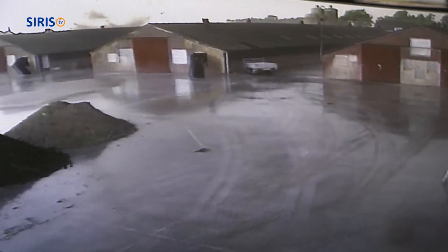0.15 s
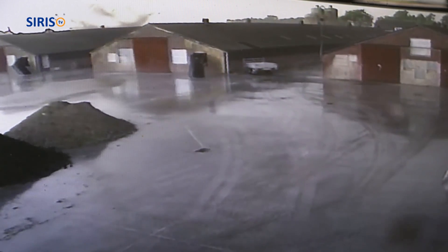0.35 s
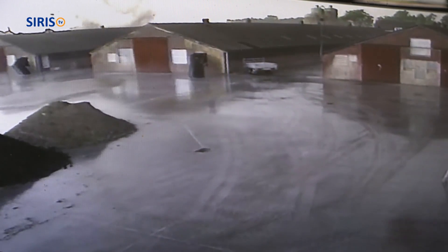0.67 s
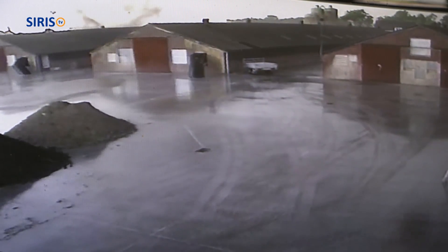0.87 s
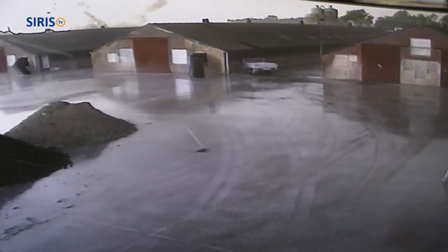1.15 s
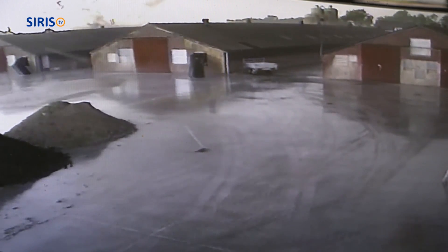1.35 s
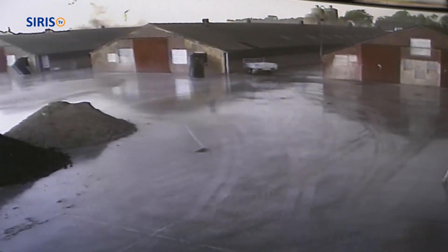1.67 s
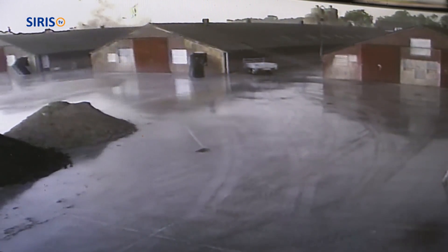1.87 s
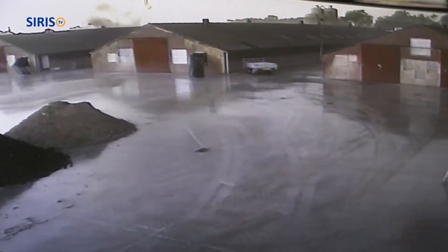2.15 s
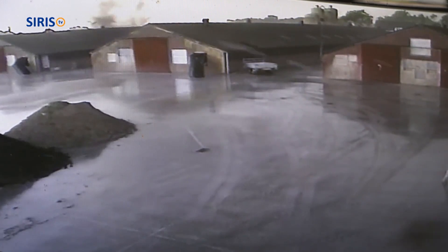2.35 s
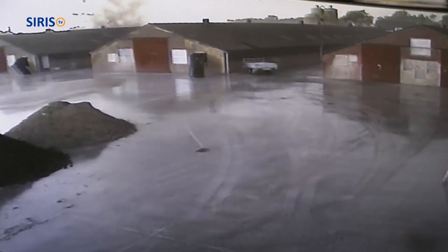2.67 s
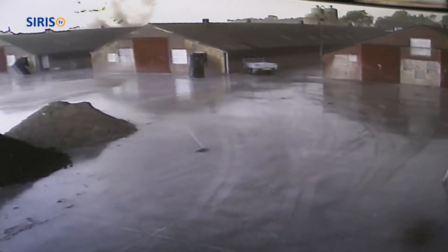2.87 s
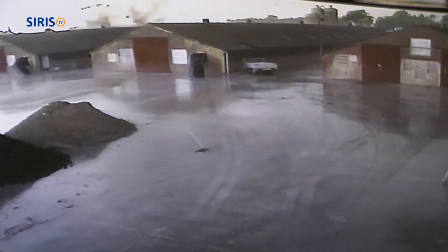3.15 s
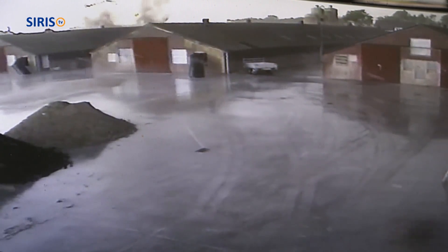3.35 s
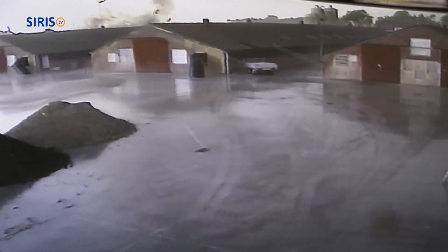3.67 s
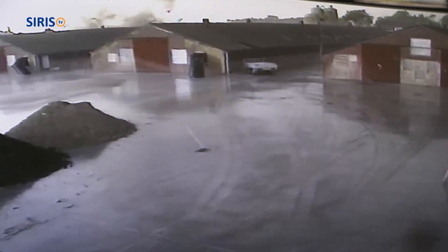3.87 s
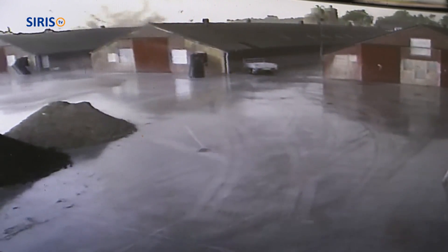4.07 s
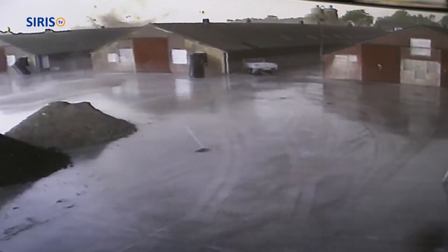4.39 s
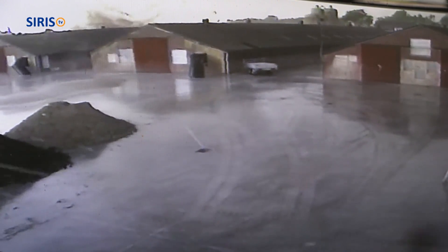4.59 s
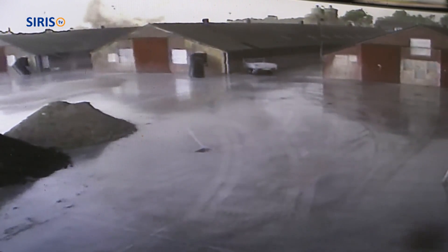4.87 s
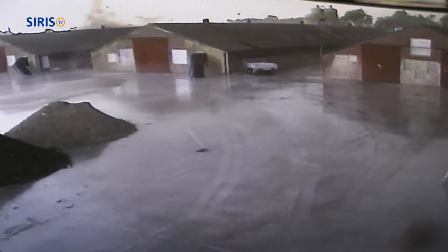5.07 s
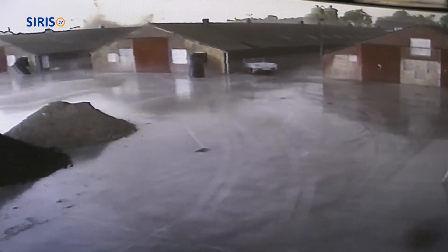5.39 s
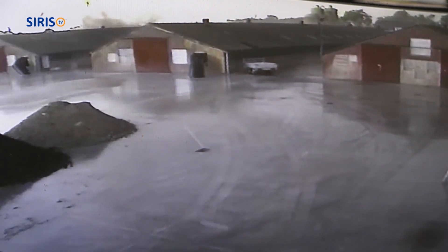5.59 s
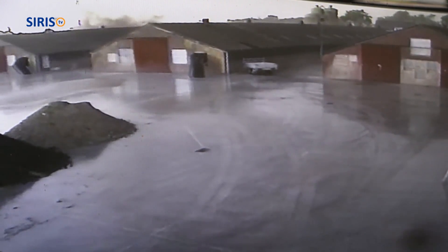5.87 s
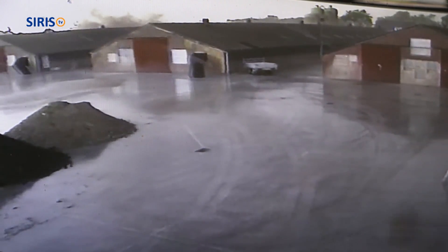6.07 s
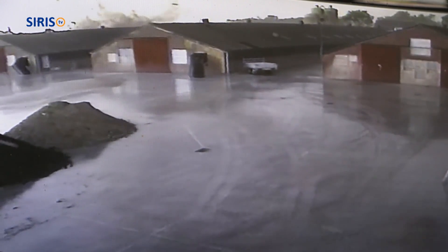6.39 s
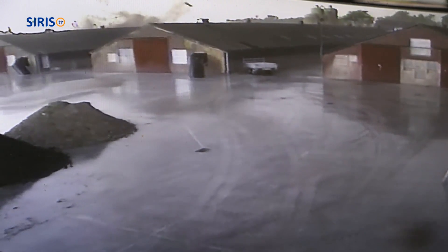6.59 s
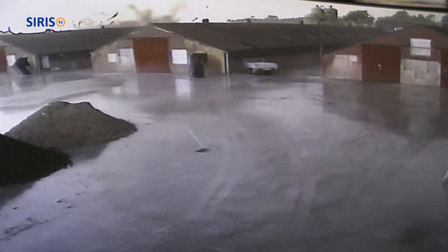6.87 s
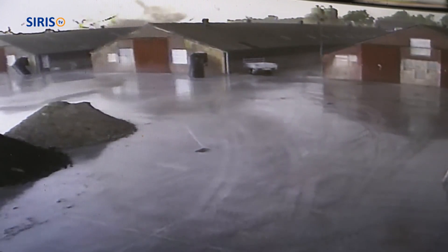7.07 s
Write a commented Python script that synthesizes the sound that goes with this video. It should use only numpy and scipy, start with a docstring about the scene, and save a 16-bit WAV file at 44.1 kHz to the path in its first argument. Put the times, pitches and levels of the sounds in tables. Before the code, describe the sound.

Violent storm wind roars over a farmyard with a deep rumble, a wavering moan and a sliding howl, while loose metal ticks and creaks nearby.

```python
"""Tornado behind farm sheds

A tornado passes behind farm sheds: a deep rumble and roar of shaped noise and a humming moan that climbs
as the vortex nears. Gusts raise and lower a howl, a noise band at sliding pitch, above hissing driven rain.
Nearby loose sheet metal creaks and ticks: grit-driven ringing modes with a short echo from the shed walls.
The wind overloads the recorder, whose flattened peaks add a rasp above the howl."""
import sys
import numpy as np
from scipy import signal
from scipy.io import wavfile
from scipy.ndimage import uniform_filter1d

SR = 44100
rng = np.random.default_rng(int(sys.argv[2]) if len(sys.argv) > 2 else 0)


def persist_wave(psi):
    """Save psi, clipped to +-1, as 16-bit WAV."""
    counts = np.round(np.clip(psi, -1, 1) * 32767).astype(np.int16)
    wavfile.write(sys.argv[1], SR, np.atleast_2d(counts).T)


N = 319284

# Large eddies, spectrum of the rumble: (frequency [Hz], relative level per Hz [dB])
RUMBLE_SPECTRUM = [(15, -2), (28, -13), (40, -3.5), (55, -1.5), (75, -9), (110, -3.5)]
# Strength of the large eddies: (time [s], level [dB])
RUMBLE_LEVEL = [(0.0, -19), (0.75, -23), (1.5, -22), (2.9, -19.5), (3.3, -23), (5.2, -28), (5.9, -22),
                (6.7, -21), (7.24, -20.5)]
# Low swells of the rumble: (centre time [s], pitch [Hz], length [s], level [dB])
LOW_SWELLS = [(0.15, 70.5, 0.25, -22.5), (0.34, 60, 0.22, -19.5), (0.655, 72, 0.12, -17.5),
              (1.307, 90.6, 0.16, -20.5), (1.551, 36, 0.3, -22), (1.674, 84.7, 0.19, -21),
              (1.93, 100, 0.14, -21.5), (2.357, 66.2, 0.15, -18.5), (2.516, 62.1, 0.19, -18),
              (2.7, 70, 0.11, -19), (2.926, 40.13, 0.32, -19.5), (6.06, 142.8, 0.14, -23)]
# The vortex tone: (time [s], pitch [Hz], level before the moan's own offsets [dB])
VORTEX = [(0.0, 56.7, -24.5), (0.2, 65.4, -26), (0.87, 79.7, -23), (1.17, 77.95, -19.5), (1.67, 86.8, -25),
          (1.9, 90.2, -29), (2.1, 91.8, -10.5), (2.28, 95.6, -25), (2.7, 97, -22), (3.0, 92, -28),
          (3.25, 93.1, -19.5), (3.73, 115.9, -22.5), (4.15, 117.7, -25), (4.27, 115.6, -15),
          (4.4, 121, -26), (4.62, 118.9, -15.5), (4.8, 124.3, -27), (5.0, 119.4, -15), (5.38, 117.5, -25.5),
          (5.66, 121.2, -19), (6.27, 120.3, -27), (6.4, 127.8, -13.5), (6.68, 124.1, -29),
          (7.0, 122, -17.5), (7.24, 117, -37)]
# Noise skirt of the moan: (multiple of vortex pitch [ratio], relative level [dB])
MOAN_SKIRT = [(.35, -23), (.55, -5.5), (.8, -4.5), (.93, -4), (1.0, -0.5), (1.08, -3), (1.25, -24)]
# Surge just above the moan: (multiple of vortex pitch [ratio], relative level [dB])
SURGE_SPECTRUM = [(1.05, -2.5), (1.25, 4.5), (1.55, -6.5), (1.9, -7), (2.4, -19.5)]
# Smaller eddies, broad body of the wind: (frequency [Hz], relative level per Hz [dB])
ROAR_SPECTRUM = [(110, -4), (160, 3), (250, -1.5), (330, -4.5), (450, -7.5), (900, -14.5), (2000, -22),
                 (4000, -34.5)]
# Gusts over edges and wires: (time [s], howl level [dB], howl pitch [Hz], rain hiss level [dB])
GUSTS = [(0.0, -20.5, 766, -46.5), (0.6, -18.5, 774, -47), (0.9, -19, 744, -45.5), (1.1, -23, 718, -46),
         (1.9, -22.5, 728, -49), (2.3, -25.5, 684.7, -52), (2.78, -22.5, 737, -50.5), (3.1, -23, 698, -50),
         (3.25, -27, 690.4, -50.5), (3.65, -19, 824, -46), (4.4, -20.5, 813, -47.5),
         (4.95, -18.5, 850, -45), (5.3, -23, 779, -47), (5.6, -25, 709, -50.5), (5.91, -30.5, 619.7, -53.5),
         (6.2, -29, 658.5, -50), (6.38, -25, 725, -48), (6.68, -21.5, 735, -50.5), (6.9, -24, 749, -50.5),
         (7.24, -26, 730.4, -49)]
# Band of the howl: (multiple of howl pitch [ratio], relative level [dB])
HOWL_SPECTRUM = [(.4, -49), (.7, -21.5), (.85, -6), (.95, 0), (1.05, -2.5), (1.2, -8.5), (1.4, -21),
                 (2.0, -24.5), (2.6, -31), (4.5, -43.5)]
# Upward spread of the howl: (time [s], lift of upper flank [dB], lift of the rush above it [dB])
HOWL_SPREAD = [(0, -1, 2), (.35, -2, 0.5), (.8, -5, -1), (1.3, 1, 2.5), (2.0, -2.5, 1), (2.6, 3.5, 1),
               (3.2, 4.5, 1), (3.6, 0, -1), (4.2, 1.5, -1.5), (4.6, 2, -2), (4.95, 1.5, 1.5),
               (5.4, -4.5, 0), (5.9, 0, -0.5), (6.5, -2, 0.5), (6.9, -2.5, -1), (7.15, 8, 2)]
# Modes of the loose sheet: (frequency [Hz], bandwidth [Hz], relative level [dB])
SHEET_MODES = [(3460, 115, -5.5), (2750, 400, -5), (3900, 700, -3), (4550, 600, -2), (5300, 600, -1),
               (6200, 1000, -2), (7400, 1200, -7)]
# Single ticks: (time [s], strength before SHEET_DB [dB], brightness [dB per octave])
TICKS = [(2.3231, -26, -4), (2.3773, -24, -2), (2.911, -31, 12), (3.707, -25, -1), (3.757, -26, 2),
         (3.8077, -23, -2), (4.0052, -24, -4), (4.0161, -27, -2), (4.0702, -25, -6), (4.1598, -29, 6),
         (4.6424, -27, 2), (4.668, -30, 3), (5.0332, -24, -6), (5.1498, -22, -5), (5.34, -30, 1),
         (5.6545, -30, 3), (6.025, -28, -1), (6.364, -27, -2), (6.402, -27, 3), (6.4389, -29, 3),
         (6.5241, -23, 0), (6.552, -28, -2), (6.8216, -28, 1), (7.1591, -23, -4)]
# The sheet scraping on its fixings in runs of quick slips: (time [s], length [s],
# level before SHEET_DB [dB], brightness [dB per octave], lift of the narrow squeaking mode [dB])
CREAKS = [(2.394, 0.1, -48, -12, -11), (2.499, 0.16, -52, -1, -11), (3.21, 0.17, -51, 3, 0),
          (3.31, 0.26, -49, 0, -3), (3.551, .07, -48, -4, -4), (3.8, 0.036, -51, 1, -4),
          (4.0, 0.1, -64, -4, 5), (4.135, 0.036, -49, 6, -3), (4.12, 0.18, -51, -5, 8),
          (4.859, 0.13, -49, -3, -9), (5.173, 0.15, -49, -2, -4), (5.961, 0.32, -48, 2, -2),
          (6.27, 0.06, -50, 5, -4), (6.366, 0.089, -53, 12, -1), (6.526, 0.1, -48, -5, -4),
          (6.81, 0.085, -50, 0, -2), (6.621, .5, -58, 2, -7), (7.12, 0.12, -48, -5, -8)]
# Driven rain, spectrum of the hiss: (frequency [Hz], relative level per Hz [dB])
RAIN_SPECTRUM = [(900, -14), (1500, -22), (3000, 5.5), (6000, 0.5), (9000, -5), (12000, -9.5), (15000, -20)]
# Likeness of the rain at the two microphones: (frequency [Hz], correlation [0 to 1])
RAIN_LIKENESS = [(900, .65), (4000, .62), (6000, .72), (8000, .84), (15000, .83)]

# Every pan is left minus right, in dB.
CORE_DB, BREAK_DB = -3.5, 1.5  # the clean hum relative to the vortex level, and how unevenly it breaks up
WAVER, WAVER_PER_S = .02, 10  # the hum strays from its pitch by this share, this often
HOWL_WANDER, HOWL_WANDER_PER_S = .017, 7  # the same for the howl
HOWL_DRIFT_DB_PER_S, RAIN_DRIFT_DB_PER_S = 0.4602, 0.59  # from the right towards the middle
SURGE_DB = -31.5
SWELL_S, SWELL_DB, SWELL_SPREAD_S = 5.97, 7.5, 0.39  # the surge swells once, in the lull of the howl
ROAR_DB, ROAR_DB_PER_OCTAVE = -30.5, 3  # level with the moan at 100 Hz; the roar grows as the moan climbs
SHEET_DB = -2.5  # the sheet is half sunk in the wind
TICK_DECAY_S, TICK_PAN_DB = .003, 4  # time constant of a short rattle of grit, and its mean pan
SLIPS_PER_S, CREAK_LUMPS_DB = 110, 1.5  # average slip rate; slips come in uneven bunches
CEILING = 0.35  # amplitude where the recorder overloads
BASS_HZ, EDGE_HZ = 7, 14950  # recorder's bass roll-off and upper band limit


def rumble(t):
    """Large eddies: lumpy pressure, stronger on the windward right, only partly alike at the two microphones."""
    return air(lambda s, hz: read(RUMBLE_SPECTRUM, hz), column(RUMBLE_LEVEL, t, axis=1), size=4096,
               same=0.46, pan_db=-8.5, patchy_db=1.07, patch_hz=30, patch_s=.08)


def low_swells(t):
    """The rumble's low swells: a few low cycles that swell and fade."""
    s, hz, length, db = np.transpose(LOW_SWELLS)[:, :, None]
    swell = gain_of(db) * np.exp(-(2 * (t - s) / length) ** 2)
    cycles = np.sqrt(2) * np.sin(2 * np.pi * (hz * t + rng.random(s.shape)))
    return (swell * cycles).sum(0) * panned(pan_db=-6.5)


def moan(t):
    """A broken hum on the vortex pitch, swelling and fading, on a skirt of noise reaching below it."""
    level_db = column(VORTEX, t, axis=2)
    stray = 1 + WAVER * wander(t, WAVER_PER_S)
    lumps = wander(t, WAVER_PER_S)
    pitch = stray * column(VORTEX, t, axis=1)
    hum = np.sqrt(2) * np.sin(2 * np.pi * np.cumsum(pitch) / SR)
    core = gain_of(level_db + CORE_DB + BREAK_DB * lumps) * hum * panned(pan_db=0.0)
    skirt_db = uniform_filter1d(level_db, SR // 2) - .8  # follows the vortex level over half a second
    skirt = air(lambda s, hz: read(MOAN_SKIRT, hz / column(VORTEX, s, axis=1)), skirt_db,
                size=4096, same=1.0, pan_db=1.5, patchy_db=2.0, patch_hz=20, patch_s=.12)
    return core + skirt


def surge(t):
    """Smaller eddies tied to the vortex: a noise band just above the moan, rising with it."""
    level_db = SURGE_DB + SWELL_DB * np.exp(-((t - SWELL_S) / SWELL_SPREAD_S) ** 2)
    return air(lambda s, hz: read(SURGE_SPECTRUM, hz / column(VORTEX, s, axis=1)), level_db, size=2048,
               same=0.72, pan_db=-7.0, patchy_db=3.5, patch_hz=60, patch_s=.1)


def roar(t):
    """Smaller eddies: the broad body of the wind, louder at a higher vortex pitch."""
    level_db = ROAR_DB + ROAR_DB_PER_OCTAVE * np.log2(column(VORTEX, t, axis=1) / 100)
    return air(lambda s, hz: read(ROAR_SPECTRUM, hz), level_db, size=1024,
               same=0.51, pan_db=-5.0, patchy_db=0.8, patch_hz=150, patch_s=0.11)


def howl(t):
    """Eddies shed from edges at a rate set by wind speed: one streaky band that slides and wanders with pitch."""
    def shape(s, hz):
        stray = 1 + HOWL_WANDER * wander(s, HOWL_WANDER_PER_S)
        ratio = hz / (column(GUSTS, s, axis=2) * stray)
        flank = np.exp(-(np.log(ratio + 1e-6) - np.log(1.33)) ** 2 / 0.014)
        rush = np.clip((ratio - 1.5) / 0.34, 0, 1)
        spread_db = flank * column(HOWL_SPREAD, s, axis=1) + rush * column(HOWL_SPREAD, s, axis=2)
        return read(HOWL_SPECTRUM, ratio) + spread_db
    return air(shape, column(GUSTS, t, axis=1), size=2048, same=1.0,
               pan_db=-7.0 + HOWL_DRIFT_DB_PER_S * t, patchy_db=1.5, patch_hz=40, patch_s=0.1)


def sheet():
    """Loose metal close by: ticks and creaks, with a short echo from the shed walls as a decaying noise tail."""
    near = np.zeros((2, N))
    add_ticks(near)
    for s, *run in CREAKS:
        add(near, s, creak(*run) * panned(pan_db=-.5))
    tail = rng.standard_normal((2, 4000)) * gain_of(-60 * np.arange(4000) / SR / .1)  # 60 dB down per 0.1 s
    tail = tail / np.linalg.norm(tail[0])
    echo = signal.oaconvolve(near, tail, axes=1)[:, :N]
    return near + gain_of(-5.0) * echo


def add_ticks(near):
    """Each tick is a short rattle of grit that rings the sheet at a slightly different place and pan."""
    first_mode = np.arange(len(SHEET_MODES)) == 0
    chance = rng.standard_normal((len(TICKS), len(SHEET_MODES) + 1))
    fade = np.exp(-np.arange(400) / SR / TICK_DECAY_S)
    grits = rng.standard_normal((len(TICKS), 400)) * fade
    for (s, strength_db, brightness_db), (side, *tint), grit in zip(TICKS, chance, grits):
        ring = blow(brightness_db, 1.5 * np.array(tint) - 3.0 * first_mode)
        ring = np.convolve(ring, grit / np.linalg.norm(grit))
        add(near, s, gain_of(strength_db) * ring * panned(TICK_PAN_DB + 2.1 * side))


def creak(length, db, brightness_db, squeak_db):
    """Uneven slips, each a small cluster of grit; some runs set the first, narrow mode squeaking."""
    count = int(length * SR)
    jitter, grit, tint, lumps = rng.standard_normal((4, SR // 2))
    lumps = evened(uniform_filter1d(lumps, size=600))
    rate = SLIPS_PER_S * (1 + 1.7 * uniform_filter1d(jitter, 400))
    turns = np.cumsum(rate)[:count] / SR
    pulses = 0.5 + np.exp(-(turns % 1) / 0.047)  # each slip starts hard and dies away
    slips = pulses * grit[:count] * signal.windows.tukey(count, .8)
    tiring_db = -4.0 * np.arange(count) / count  # each run tires as it goes
    slips = slips * gain_of(CREAK_LUMPS_DB * lumps[:count] + tiring_db)
    first_mode = np.arange(len(SHEET_MODES)) == 0
    tint_db = 1.5 * tint[:len(SHEET_MODES)] + squeak_db * first_mode
    return gain_of(db) * evened(np.convolve(slips, blow(brightness_db, tint_db)))


def blow(brightness_db, tint_db):
    """The ring of the sheet after one blow; where it is struck tilts and tints its decaying modes."""
    hz, width, db = np.transpose(SHEET_MODES)[:, :, None]
    ring = np.arange(1200) / SR
    weight = gain_of(db + brightness_db * np.log2(hz / 4500) + tint_db[:, None])
    weight = weight * (-1.) ** np.arange(len(hz))[:, None]  # neighbours move in opposite sense and fill the gaps
    modes = np.exp(-np.pi * width * ring) * np.sin(2 * np.pi * hz * ring)
    contact = np.sin(np.pi / 2 * np.minimum(ring / .0008, 1)) ** 2  # a soft contact, not a crack
    sound = (weight * modes).sum(0) * contact
    return sound / abs(sound).max()


def rain(t):
    """Driven rain and grit: a smooth hiss of many small impacts, drifting from the right towards the middle."""
    return air(lambda s, hz: read(RAIN_SPECTRUM, hz), column(GUSTS, t, axis=3), size=512,
               same=lambda hz: read(RAIN_LIKENESS, hz), pan_db=-4.5 + RAIN_DRIFT_DB_PER_S * t,
               patchy_db=1.6, patch_hz=1500, patch_s=.09)


def air(shape, level_db, size, same, pan_db, patchy_db, patch_hz, patch_s):
    """Noise from random short-time spectra: shape(t, hz) in dB, drifting patches, two partly alike channels."""
    hop = size // 4
    t = np.arange(N // hop + 5) * hop / SR
    hz = np.fft.rfftfreq(size, 1 / SR)[:, None]
    a, b, c, d, patches = rng.standard_normal((len(t), len(hz), 5), dtype=np.float32).T
    wide = int(patch_hz * size / SR) + 1
    long = int(patch_s * SR / hop) + 1
    patches = evened(uniform_filter1d(uniform_filter1d(patches, wide, 0), long, 1))
    colour = gain_of(shape(t, hz) + patchy_db * patches)
    colour = colour / np.sqrt(uniform_filter1d((colour ** 2).mean(0), 4 * long))  # level_db alone sets slow loudness
    same = np.clip(same(hz) if callable(same) else same, 0, 1)
    left = a + 1j * b
    right = same * left + np.sqrt(1 - same ** 2) * (c + 1j * d)
    spectra = colour * np.array([left, right])
    noise = signal.istft(spectra, nperseg=size, noverlap=size - hop)[1][:, :N]
    return evened(noise) * gain_of(level_db) * panned(pan_db)


def wander(t, per_s):
    """Slow chance: random values at a steady rate, joined by straight lines."""
    knots = np.arange(0, N / SR + 1, 1 / per_s)
    return np.interp(t, knots, rng.standard_normal(len(knots)))


def gain_of(db):
    """Amplitude factor of a level in dB."""
    return 10 ** (np.asarray(db) / 20)


def evened(x):
    """Scale to an RMS of one."""
    return x / np.sqrt(np.mean(x ** 2) + 1e-20)


def read(points, x):
    """A curve joined by straight lines on a log axis, dropping to -90 outside its ends."""
    f, value = np.transpose(points)
    return np.interp(np.log(x + 1e-6), np.log(f), value, left=-90, right=-90)


def column(table, t, axis):
    """One column of a timed table, joined by straight lines."""
    rows = np.array(table)
    return np.interp(t, rows[:, 0], rows[:, axis])


def panned(pan_db):
    """Left and right gains for a level difference, left minus right."""
    return gain_of(np.array([pan_db, -pan_db]).reshape(2, -1) / 2)


def add(mix, s, sound):
    """Lay a sound into the mix from time s, cut at the end."""
    part = mix[:, round(s * SR):][:, :sound.shape[1]]
    part += sound[:, :part.shape[1]]


def scene():
    """The wind's layers, the sheet close by and the rain, summed at the two microphones."""
    t = np.arange(N) / SR
    wind = rumble(t) + low_swells(t) + moan(t) + surge(t) + roar(t) + howl(t)
    return wind + gain_of(SHEET_DB) * sheet() + rain(t)


def record(dry):
    """Peaks are cut flat at the ceiling with a narrow knee; a bass roll-off tilts the flats; then the band limit."""
    knee = 58.0
    flat = dry / (1 + abs(dry / CEILING) ** knee) ** (1 / knee)
    tilted = signal.lfilter(*signal.butter(1, BASS_HZ, "high", fs=SR), flat)
    band_limit = signal.firwin(1023, EDGE_HZ, window=("kaiser", 9), fs=SR)
    return signal.oaconvolve(tilted, band_limit[None], "same")


dry = scene()
out = record(dry)
persist_wave(out)
```